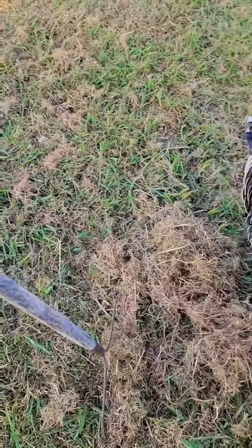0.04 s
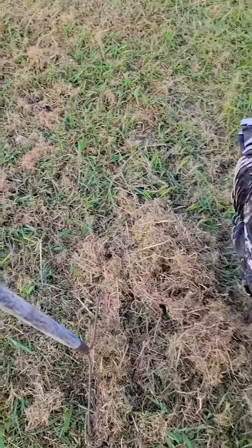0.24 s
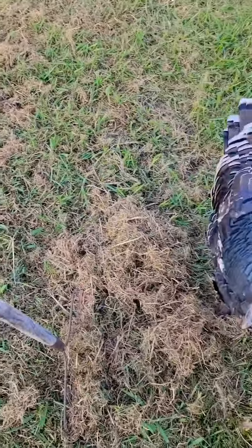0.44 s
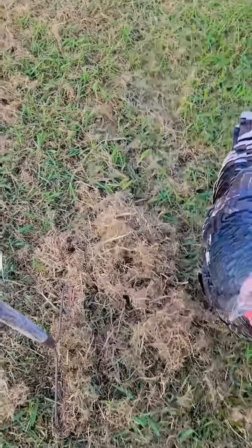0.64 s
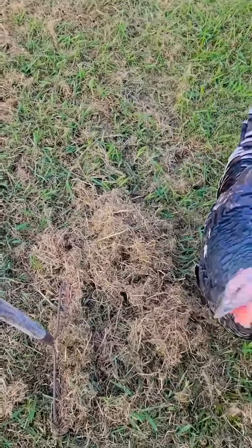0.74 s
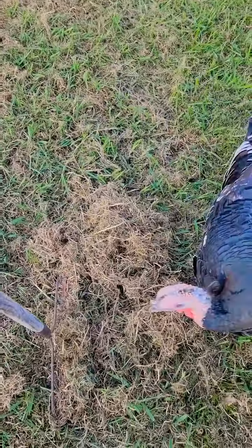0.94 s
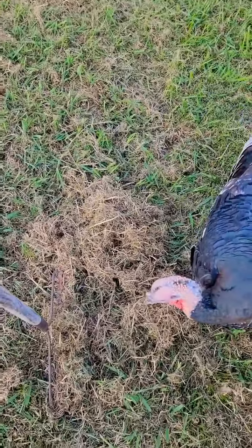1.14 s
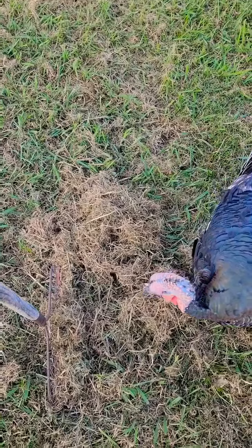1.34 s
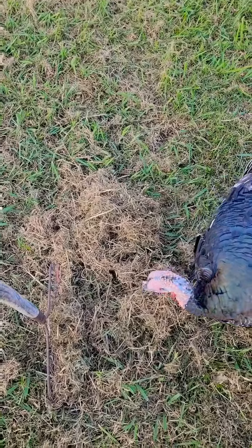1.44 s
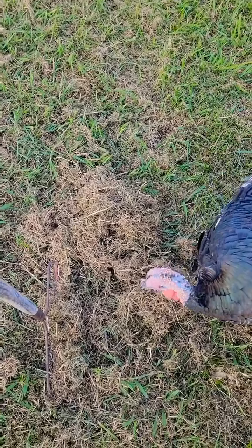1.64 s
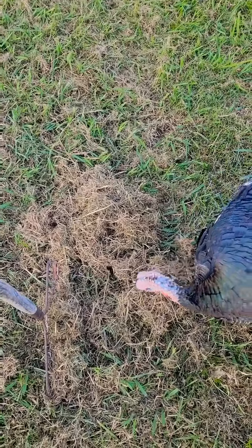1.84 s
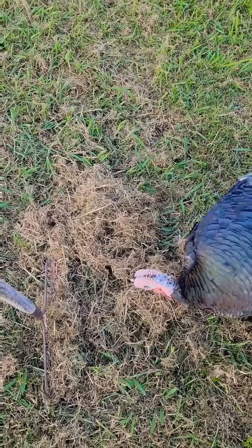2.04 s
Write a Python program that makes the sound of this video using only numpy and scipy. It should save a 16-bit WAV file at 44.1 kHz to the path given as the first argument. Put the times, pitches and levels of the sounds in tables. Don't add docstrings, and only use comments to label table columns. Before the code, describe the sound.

Two short, clear turkey chirps about a second apart, the second quieter and dropping at the end, over steady far road roar, faint engine hum, thin bird whistles and cricket trills; open lawn, handheld phone, stereo.

```python
import sys
import numpy as np
from scipy import signal
from scipy.fft import rfft, irfft
from scipy.io import wavfile
from scipy.ndimage import uniform_filter1d, map_coordinates

SR = 44100
rng = np.random.default_rng(int(sys.argv[2]) if len(sys.argv) > 2 else 0)


def gain_from_db(level_db):
    decades = np.asarray(level_db, float) / 20
    return 10 ** decades


def bounce(signal):
    frames = np.transpose(np.atleast_2d(signal))
    limited = np.clip(frames, -1, 1)
    pcm = np.round(limited * 32767).astype(np.int16)
    wavfile.write(sys.argv[1], SR, pcm)


N = 92610


def unit(x):
    return x / np.sqrt(np.mean(x ** 2) + 1e-20)


def along(points, hz):
    f, v = np.transpose(points)
    return np.interp(np.log(hz + 1), np.log(f + 1), v)


def curves(rows, outside=None):
    s, *cols = np.transpose(rows)
    return [np.interp(np.arange(N) / SR, s, c, outside, outside) for c in cols]


def wobble(rate):
    knots = rng.standard_normal(int(N * rate / SR) + 4)
    return map_coordinates(knots, [np.arange(N) * rate / SR])


def sides(pan_db):
    return gain_from_db(np.array([pan_db / 2, -pan_db / 2])).reshape(2, -1)


def left_only(value):
    return np.array([[value], [0]])


def rush(spectrum, patchy_db):
    # (frequency [Hz], likeness [0-1])
    alike = [(100, .98), (300, 0.86), (500, 0.24), (900, 0.93), (1300, 0.61), (2200, 0.15), (16000, 0.077)]
    # (frequency [Hz], left lead [rad])
    left_lead = [(60, .3), (300, 0.27), (500, 1.42), (750, 2.23), (1050, 2.92), (2000, 1.87)]
    # (frequency [Hz], left minus right [dB])
    balance = [(60, -0.5), (400, -4), (800, -2), (1500, -6.5), (2500, -0.5), (16000, 1)]
    z = signal.stft(rng.standard_normal((2, N + 512)), nperseg=512)[2]
    patches = uniform_filter1d(rng.standard_normal(z.shape[1:]), size=5, axis=0)
    patches = unit(uniform_filter1d(patches, size=10, axis=1))
    noise = signal.istft(z * gain_from_db(patchy_db * patches), nperseg=512)[1][:, :N]
    a, b = rfft(noise)
    hz = np.fft.rfftfreq(N, 1 / SR)
    turn = np.arccos(np.clip(along(alike, hz), 0, 1)) / 2
    mid, side = a * np.cos(turn), b * np.sin(turn)
    left = (mid + side) * gain_from_db(along(balance, hz)) * np.exp(1j * along(left_lead, hz))
    colour = (hz > spectrum[0][0]) * (hz < 15480) * gain_from_db(along(spectrum, hz))
    return unit(irfft(np.array([left, mid - side]) * colour, N))


def echoes(x, t60):
    t = np.arange(SR // 2) / SR
    tail = rng.standard_normal((2, len(t))) * gain_from_db(-60 * t / t60) * (t > .012)
    return signal.fftconvolve(x[None], tail / np.linalg.norm(tail[0]), axes=1)[:, :N]


def traffic():
    # (time [s], level [dB])
    roar_level = [(0, -39.5), (1, -41), (2.1, -40)]
    # (frequency [Hz], density [dB per Hz])
    roar_colour = [(90, -10), (280, -16), (450, -6.5), (750, 0.5), (1100, -1.5), (1500, -10.5), (2300, -25),
                   (4000, -37.5)]
    rumble_colour = [(20, -20), (32, -12), (48, 1), (61, 5.5), (75, -0.5), (110, -16.5), (200, -49)]
    hiss_colour = [(2000, 16), (4800, 3), (7000, 8), (11000, -16), (15500, -8)]
    roar = gain_from_db(curves(roar_level)[0] + 0.58 * wobble(5.04)) * rush(roar_colour, patchy_db=1.5)
    rumble = gain_from_db(-49.5) * rush(rumble_colour, patchy_db=-0.5)
    hiss = gain_from_db(-82.0) * rush(hiss_colour, patchy_db=2)
    return roar + rumble + hiss


def engine():
    # (time [s], low tone level [dB], high tone level [dB])
    hum = [(0, -50.5, -40.5), (.17, -47.5, -47), (.3, -60.5, -50), (.55, -55, -48.5), (.95, -53, -51),
           (1.15, -78, -47.5), (2.1, -69, -70)]
    t = np.arange(N) / SR
    low_db, high_db = curves(hum)
    low_phase = 2 * np.pi * 349 * t + 0.6 * wobble(11.2) + left_only(.3)
    low = gain_from_db(low_db + 1.1 * wobble(11.0)) * np.sin(low_phase) * sides(-2.4)
    high_phase = 2 * np.pi * 566 * t + 0.97 * wobble(14) + left_only(1.6)
    high = gain_from_db(high_db + 2.8 * wobble(12.24)) * np.sin(high_phase) * sides(-2.0)
    return low + high


def cricket(chirps, hz, rate, width_s):
    t, gate = np.arange(N) / SR, np.zeros(N)
    for s, pulses, db in chirps:
        for k in range(int(pulses)):
            middle = s + (k + rng.normal(0, .07)) / rate
            gate += gain_from_db(db + rng.normal(0, 2)) * np.exp(-((t - middle) / width_s) ** 2)
    return gate * np.sin(2 * np.pi * np.cumsum(hz + 70 * wobble(200)) / SR)


def crickets():
    # (start [s], pulses [count], level [dB])
    low_chirps = [(.565, 6.4, -61), (.892, 8.3, -60.5), (1.252, 6.2, -63), (1.6, 9.3, -60.5),
                  (1.975, 7.2, -66)]
    high_chirps = [(.55, 6, -66), (.861, 7, -66), (1.17, 6, -65), (1.47, 7, -64), (1.83, 5, -66)]
    thin_chirps = [(1.04, 7, -66), (1.38, 7, -66), (1.66, 7, -67), (1.98, 8, -65)]
    low = cricket(low_chirps, hz=6780, rate=85, width_s=.0022)
    high = cricket(high_chirps, hz=8050, rate=90, width_s=.0018)
    thin = cricket(thin_chirps, hz=9450, rate=90, width_s=.0016)
    return low + high + thin


def whistles(rows, pan_db, lead):
    out, t = np.zeros((2, N)), np.arange(N) / SR
    for s, length, from_hz, to_hz, db in rows:
        u = np.clip((t - s) / length, 0, 1)
        hz = from_hz + (to_hz - from_hz) * u ** 1.2 + 20 * wobble(100)
        phase = 2 * np.pi * np.cumsum(hz) / SR
        fade_s = min(.03, length / 4)
        shape = np.clip(np.minimum(u, 1 - u) * length / fade_s, 0, 1)
        level = np.sqrt(2) * shape * gain_from_db(db + 1.4 * wobble(50))
        out += level * np.sin(phase + left_only(lead))
    return sides(pan_db) * (out + gain_from_db(-6.5) * echoes(out[0], .2))


def small_birds():
    # (start [s], length [s], from [Hz], to [Hz], level [dB])
    right_bird = [(.36, 0.081, 3410, 3406, -60), (.44, .08, 3430, 3310, -57),
                  (.505, 0.14, 3310, 3188, -60.5), (.62, .085, 3150, 3080, -65),
                  (1.028, 0.061, 3370, 3366, -60), (1.104, 0.032, 3300, 3300, -62.5),
                  (1.168, 0.018, 3200, 3140, -71.5), (1.184, 0.027, 3160, 3090, -57)]
    left_bird = [(1.31, 0.21, 3250, 2980, -72), (1.49, 0.047, 3220, 3400, -60.5),
                 (1.515, 0.088, 3357, 3317, -52.5), (1.58, .11, 3283, 3250, -54),
                 (1.68, 0.079, 3250, 3176, -60), (1.725, 0.11, 3166, 3110, -64),
                 (1.81, 0.08, 3150, 2760, -56), (1.78, 0.12, 3390, 3270, -62.5),
                 (1.82, 0.048, 3220, 3020, -64), (1.87, 0.09, 3000, 2770, -63),
                 (1.915, 0.031, 3260, 3154, -61), (1.97, 0.069, 3233, 3250, -66),
                 (2.03, 0.12, 3180, 2930, -60.5)]
    return whistles(right_bird, pan_db=-2.0, lead=-1.36) + whistles(left_bird, pan_db=4.5, lead=1.0)


def grass():
    # (time [s], level [dB], left minus right [dB])
    rustle_level = [(0, -57, -1), (.12, -61.5, -5), (.3, -58, 0), (.55, -61.5, -14), (.68, -65, -8),
                    (1, -70.5, -2), (1.6, -80.5, 17), (2.1, -82, 19)]
    # (frequency [Hz], density [dB per Hz])
    rustle_colour = [(3000, -1), (5000, -9), (7000, -3.5), (10500, -7.5), (13000, -7.5), (15500, 1.5)]
    # (time [s], peak [dB], pitch [Hz], share of crackle [ratio], left minus right [dB])
    ticks = [(.3113, -39, 14600, .3, 6), (.3401, -54, 13600, .3, -1.5), (.498, -56, 5000, .5, 0),
             (.612, -57, 9000, .6, -4), (.6455, -54, 7500, .6, -5), (.795, -60, 7000, .5, 0),
             (.848, -60, 7500, .5, 0), (1.7216, -56, 7000, 1.6, -2)]
    level_db, pan_db = curves(rustle_level)
    grains = gain_from_db(2.2 * wobble(900) + 1.5 * wobble(70) + 1.1 * wobble(8))
    out = gain_from_db(level_db + 2) * sides(pan_db) * unit(grains * rush(rustle_colour, patchy_db=1.6))
    t = np.arange(N) / SR
    f = np.fft.rfftfreq(N, 1 / SR)
    for s, db, hz, crackle, pan in ticks:
        late = t - s - .0008
        noise = rfft(rng.standard_normal((2, N))) * (f > 3000) * (f < 15200)
        snap = np.sin(2 * np.pi * hz * late) + crackle * unit(irfft(noise, N))
        out += gain_from_db(db + 5.5) * sides(pan) * np.exp(-(late / .0003) ** 2) * snap
    return out


def turkey():
    # (time [s], pitch [Hz], level at the right port [dB])
    first_call = [
        [(.217, 520, -45), (.221, 600, -25), (.226, 660, -22), (.231, 695, -21), (.235, 715, -17.5),
         (.24, 735, -17.5), (.245, 760, -22), (.249, 780, -42)],
        [(.241, 930, -40), (.246, 945, -18.5), (.256, 955, -18), (.268, 985, -19), (.276, 1115, -30),
         (.288, 1060, -27), (.293, 1110, -30), (.298, 1270, -32), (.303, 1300, -48)],
        [(.303, 740, -50), (.308, 720, -39), (.322, 740, -41), (.33, 600, -46)],
        [(.329, 860, -44), (.333, 845, -25), (.338, 830, -21), (.351, 865, -21), (.358, 885, -26),
         (.367, 860, -23), (.373, 790, -26), (.378, 630, -30), (.384, 560, -44)],
    ]
    second_call = [
        [(1.019, 800, -46), (1.0225, 830, -26), (1.025, 860, -28), (1.029, 900, -44)],
        [(1.025, 950, -42), (1.03, 970, -27), (1.036, 978, -23.5), (1.05, 980, -22), (1.063, 988, -24),
         (1.072, 1000, -33), (1.081, 980, -27.5), (1.091, 975, -26), (1.097, 990, -44)],
        [(1.094, 1330, -50), (1.099, 1400, -37), (1.104, 1450, -50)],
        [(1.127, 940, -44), (1.132, 935, -26), (1.139, 925, -25), (1.149, 980, -26), (1.152, 1100, -36),
         (1.157, 1400, -40), (1.161, 1450, -50)],
        [(1.165, 1400, -48), (1.171, 1200, -38), (1.175, 930, -32), (1.179, 840, -20.5), (1.184, 760, -27),
         (1.186, 600, -33), (1.189, 550, -25.5), (1.192, 530, -29), (1.195, 500, -48)],
    ]
    # (left minus right [dB], left lead [rad], turn over the note [dB])
    head_pose = [(-2.5, 1.1, 2), (-3.5, 2.1, 8), (-6, 1.5, 0), (-14.5, 1.5, 0), (-14, 1.7, 0),
                 (-16.5, 1.7, 0), (-11, 1.5, 0), (-16.5, 2.4, 0), (-12.5, 2.6, 0)]
    # (second partial [dB], third partial [dB], change over the note [dB],
    # left minus right [dB])
    overtones = [(-16, -35, -25, 2), (-32, -54, 6, 0), (-40, -60, 0, 0), (-36, -52, 10, -3),
                 (-32, -55, 0, -8), (-25, -41, 0, -11), (-30, -36, 0, 0), (-27, -52, -6, -10),
                 (-40, -62, 0, -4)]
    # (frequency [Hz], gain [dB])
    throat = [(2000, 0), (2200, 0), (2400, 8), (2600, 17), (2800, 6), (3000, 0)]
    out, t = np.zeros((2, N)), np.arange(N) / SR
    for rows, pose, partials in zip(first_call + second_call, head_pose, overtones):
        pan_db, lead, turn_db = pose
        second_db, third_db, drift_db, upper_pan_db = partials
        hz, db = curves(rows)[0], curves(rows, -200)[1]
        phase = 2 * np.pi * np.cumsum(hz * (1 + .006 * wobble(300))) / SR
        progress = np.interp(t, [rows[0][0], rows[-1][0]], [-.5, .5])

        second_level = second_db + along(throat, 2 * hz) + 1.4 * wobble(150)
        second = gain_from_db(second_level) * np.sin(2 * phase + .3 * wobble(250))
        third_level = third_db + drift_db * progress + along(throat, 3 * hz) + 1.4 * wobble(146)
        third = gain_from_db(third_level) * np.sin(3 * phase + .5 * wobble(230))
        breath = gain_from_db(-40) * unit(np.gradient(wobble(6000)))
        upper = gain_from_db(drift_db * progress + left_only(upper_pan_db)) * (second + third + breath)

        left_db = pan_db + turn_db * progress + 10.5 * np.log2(hz / 900)
        whistle = np.sin(phase + left_only(lead)) * gain_from_db(left_db * [[1], [0]])
        level = uniform_filter1d(gain_from_db(db + .3 * wobble(200)), size=80)
        out += np.sqrt(2) * level * (whistle + upper)
    return out + gain_from_db(-28) * echoes(out[1], .2)


def scene():
    return traffic() + engine() + crickets() + small_birds() + grass() + turkey()


def low_pass(x):
    return signal.sosfilt(signal.butter(12, 16680, fs=SR, output="sos"), x)


def record(dry):
    hz = np.fft.rfftfreq(N, 1 / SR)
    limited = irfft(rfft(dry) * np.clip((16600 - hz) / 300, 0, 1), N)
    return low_pass(limited)


dry = scene()
out = record(dry)
bounce(out)
```